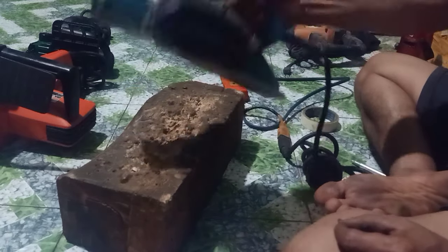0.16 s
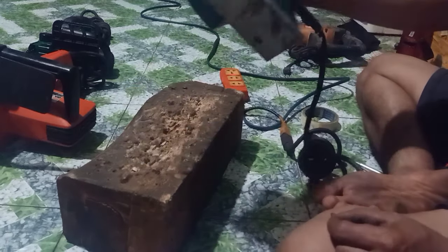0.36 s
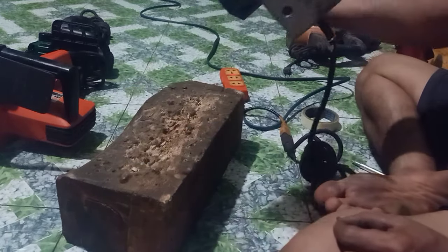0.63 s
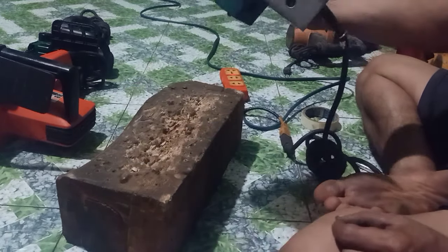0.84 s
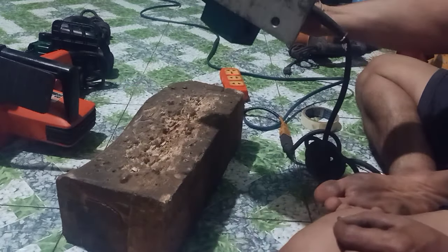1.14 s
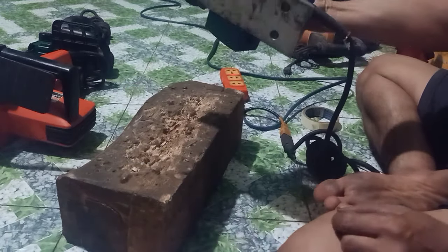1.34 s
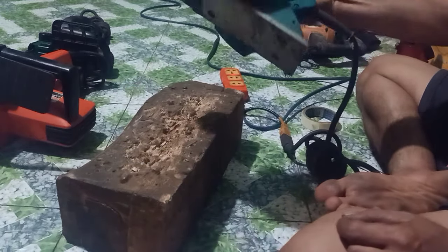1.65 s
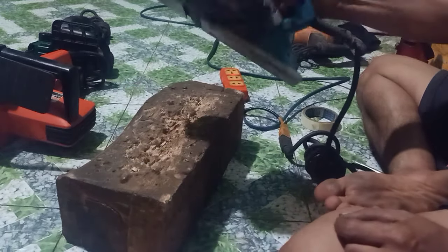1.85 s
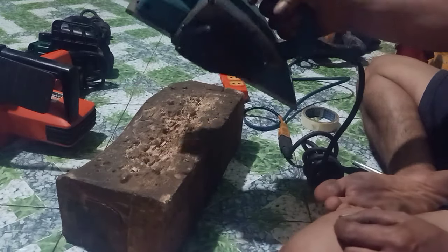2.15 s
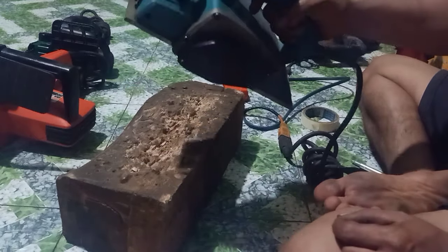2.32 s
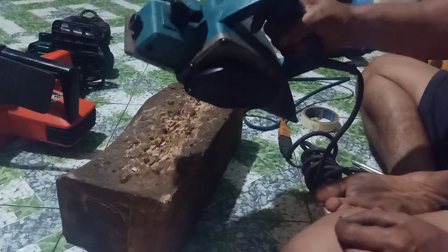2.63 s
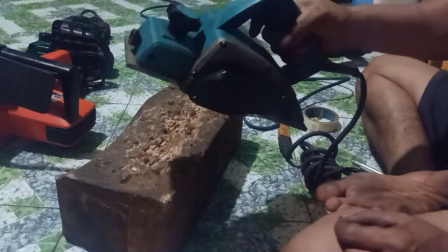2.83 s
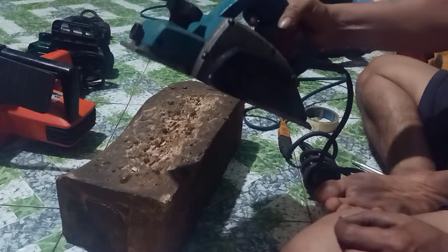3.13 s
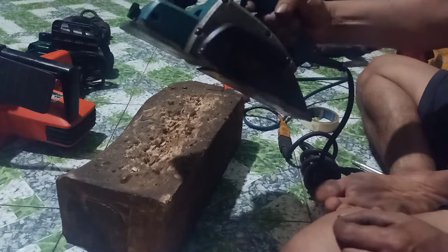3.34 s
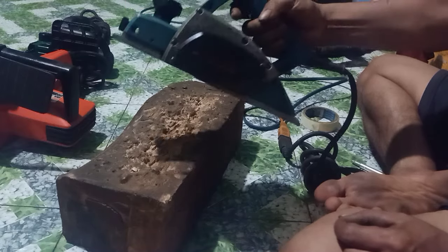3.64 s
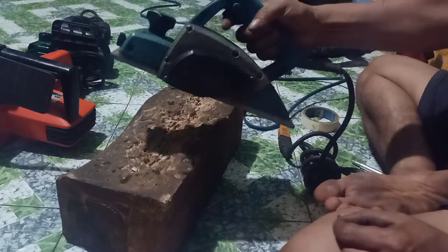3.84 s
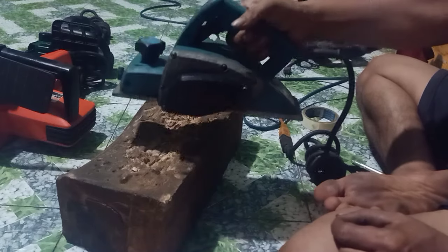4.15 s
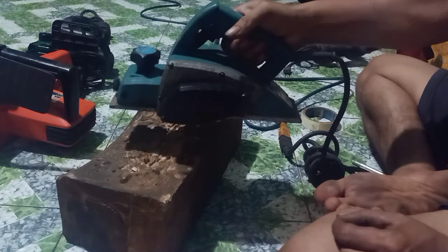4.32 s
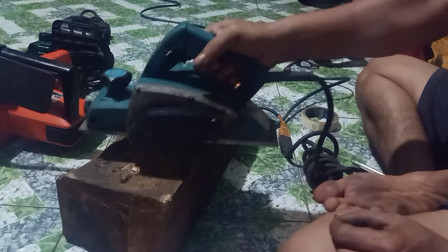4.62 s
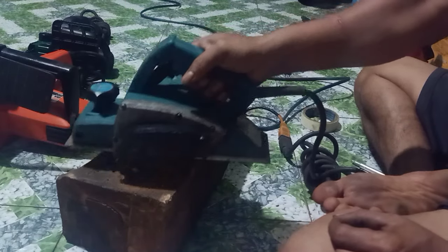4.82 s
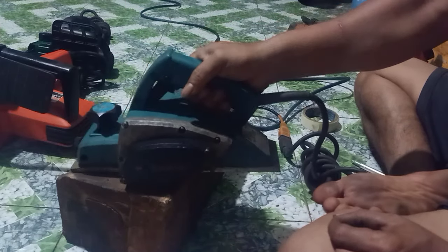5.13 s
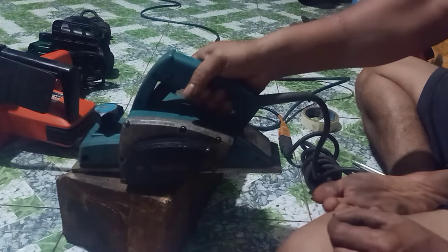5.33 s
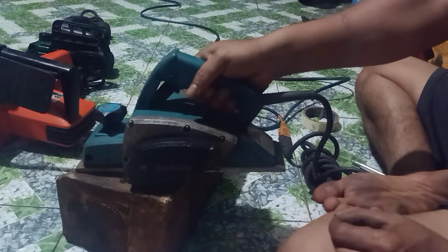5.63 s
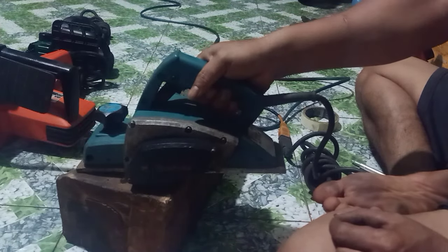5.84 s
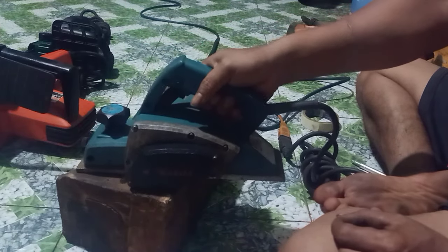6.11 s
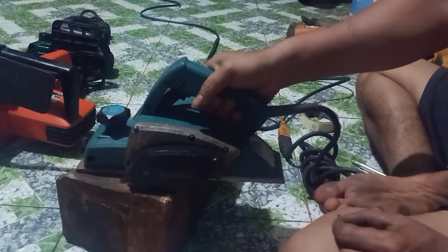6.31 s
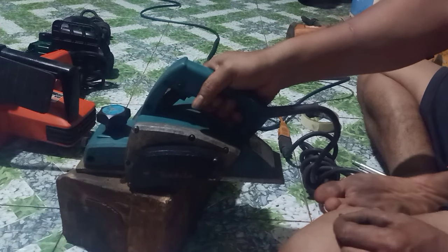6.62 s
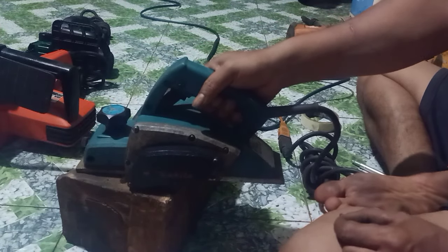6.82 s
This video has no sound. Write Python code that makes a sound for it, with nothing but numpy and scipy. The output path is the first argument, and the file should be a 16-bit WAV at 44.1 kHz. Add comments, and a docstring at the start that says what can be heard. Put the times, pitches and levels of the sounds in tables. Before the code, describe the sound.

A corded electric planer is heard close up in a small, reflective tiled room. From 0 s it is already running, its siren-like whine climbing quickly during the first second and settling by about 2 s, with a thinner, higher motor whine above, broad fan rush, brush hiss and rattling housing. A dull handling bump comes near 0.2 s. Until 3.9 s it spins freely, without biting wood, its strong tones swelling, fluttering and shifting side to side as the tool turns. At 3.9 s power is cut and the whine begins a long smooth fall, growing rougher and weaker. From about 4.2 s it buzzes against a wooden block, with short sliding scrapes around 4.7, 5.3 and 5.9 s. Chirpy bearing knocks start near 4.9 s, scattered at first, then cluster densely from 6 s into a ringing, grating chatter. The drum is still turning when the sound ends around 7 s.

```python
"""In a tiled room, a corded electric hand planer runs up unloaded over a wooden block, is switched off and coasts down.
The two-knife cutter drum chops the air like a siren; the belt-driven motor whines above it as its slots pass.
Fan air and brush hiss are coloured noise, and worn bearings rattle the resonances of the housing.
As the drum slows, the rattle breaks up into chirping knocks of the bearing cage that set the sole ringing.
Resting on the block, the tool bumps, slides and buzzes while the wood drones; a diffuse tail follows."""
import sys
import numpy as np
from scipy import signal
from scipy.fft import rfft, irfft
from scipy.io import wavfile
from scipy.ndimage import uniform_filter1d, map_coordinates

SR = 44100
rng = np.random.default_rng(int(sys.argv[2]) if len(sys.argv) > 2 else 0)


def waveform_to_disk(signal):
    """Save audio, clipped to [-1, 1], as 16-bit WAV at the path in sys.argv[1]."""
    frames = np.transpose(np.atleast_2d(signal))
    scaled = np.clip(frames, -1, 1) * 32767
    samples = np.round(scaled).astype(np.int16)
    wavfile.write(sys.argv[1], SR, samples)


N = 307377
TIME = np.arange(N) / SR
FREQS = np.fft.rfftfreq(N, 1 / SR)
FULL_HZ = 304.32  # rotation that the drum approaches under power, turns per second
OFF_S = 3.9  # the switch is let go
BELT_RATIO, CAGE_ORDER = 1.772, .355  # turns of the armature and of the bearing cage per turn of the drum

# Resonances of the housing. Each row: frequency in Hz, width in Hz, relative level in dB.
HOUSING_MODES = [(1243, 130, -6), (1412, 29, 2), (1513, 76, 2.5), (1974, 212, 3), (2241, 120, 6.5),
                 (2460, 280, 0.5), (2808, 187, 0), (3082, 106, -1.5), (3580, 490, -6.5), (4700, 480, -11.5)]
# Resonances of the metal sole. Each row: frequency in Hz, width in Hz, relative level in dB.
SOLE_MODES = [(1287, 43, 9.5), (2770, 73, 0.5), (4990, 440, -9.5)]


def drum(hz, turns):
    """Siren principle: two knives interrupt the air at the slot, giving even multiples of the rotation."""
    # How well the slot radiates each pitch. Each row: frequency in Hz, gain in dB.
    slot_gain = [(160, -17), (400, -22), (450, -7.5), (1100, -9), (1270, -9), (1780, -8), (2070, -1.5),
                 (2400, -3.5), (3000, -16.5), (3530, -10.5), (3700, -17), (4550, -11.5), (4850, -26)]
    # Weaker partials. Each row: multiple of the rotation, relative level in dB.
    overtones = [(12, -8.5), (14, -14.5), (16, -9), (20, -4.5)]
    # The main partials beam their own ways as the tool is turned and set down.
    # Each row of the five tables: time in seconds, gain in dB.
    beam_2 = [(.1, -2), (.17, -16), (.25, 0.5), (.33, -6.5), (.48, 2), (.75, -10), (.92, 6), (1.08, -4.5),
              (1.25, -8), (1.6, 4.5), (2.2, -0.5), (2.75, -15), (3.05, -1), (3.9, -6), (3.98, 2.5),
              (4.09, -3), (4.16, -6), (4.33, -3), (4.43, 1), (4.58, -4.5), (4.72, 2), (5.45, 4.5),
              (6.1, -1)]
    beam_4 = [(.3, -0.5), (.95, 2.5), (1.08, -4.5), (1.26, 5), (1.42, -0.5), (2.0, 4), (2.15, -1.5),
              (2.5, -4.5), (2.9, 3.5), (4.4, 3), (4.7, -1), (4.85, -6), (5.08, 2), (5.33, -2), (5.52, 6.5),
              (5.8, 0.5), (6.05, -8.5)]
    beam_6 = [(.1, -6), (.45, 0), (.84, -4), (.97, 3.5), (1.33, 5), (1.55, 9.5), (2.25, 3), (2.55, 8),
              (2.85, 1), (3.1, 2.5), (3.35, -3), (3.6, -3.5), (3.76, 4.5), (3.91, 6), (4.0, -2), (5.3, -2),
              (5.88, -4), (6.05, 6.5), (6.22, -6)]
    beam_8 = [(0, -21), (.15, 3), (.25, -6), (.42, 6), (.75, 2.5), (1.3, 5.5), (1.62, -3), (2.1, 3),
              (2.27, -7), (2.54, 5), (2.87, -4.5), (3.05, 6.5), (3.33, -0.5), (3.56, 7.5), (3.88, -4.5),
              (4.05, -1), (4.22, -6), (4.36, 1), (4.55, 0), (4.7, -12), (5.3, -11)]
    beam_10 = [(.02, -5), (.1, 6.5), (.17, -6), (.24, 4), (.35, -4), (.7, 1.5), (1.15, 9), (1.55, 10.5),
               (1.95, -2.5), (2.2, -1.5), (4.2, 1), (4.67, -8), (4.8, -1), (5.1, 4.5), (5.25, -4.5),
               (5.5, -8)]
    beams = {2: beam_2, 4: beam_4, 6: beam_6, 8: beam_8, 10: beam_10}
    # The same beams sweep across the two ports. Under each multiple of the rotation,
    # each row: time in seconds, left minus right in dB.
    beam_sweep = {2: [(.4, 7), (1.6, 1), (2.1, -9), (2.8, 12), (3.5, 9.5), (4.0, -3)], 4: [(1.8, -7),
                  (2.15, 20), (2.55, 13), (2.85, -12), (3.2, 0)], 6: [(1.3, 5), (2.1, -3), (2.5, 10),
                  (2.85, -10), (3.35, 8), (3.85, 16), (4.05, 0)], 8: [(.7, -1), (1.2, 0.5), (1.45, 16),
                  (2.25, 8), (2.5, 6.5), (3.6, 4.5), (4.0, 8)], 10: [(.5, -3), (1.0, 1), (1.55, 6),
                  (2.1, -2.5)]}
    # Hum of the imbalance, strongest where it shakes the body at its own pitch.
    # Each row: rotation in Hz, level in dB.
    hum_by_speed = [(110, -70), (130, -61.5), (185, -53), (225, -55.5), (300, -53.5)]
    # The hum dips while the tool is held up highest. Each row: time in seconds, gain in dB.
    hum_beam = [(.9, -5.5), (1.9, -13), (2.9, -1.5), (4.7, -2.5)]
    siren_db, siren_power = -28.5, 1.42  # relative level, and power of the speed in its amplitude
    flicker_hz = 9  # times the root of the multiple
    belt_shake_turns = .013  # with the power off the slack belt roughens the high lines most

    coasting = np.interp(TIME, [OFF_S, OFF_S + .1], [0, 1])
    turns = turns + 0.0024 * walk(1.7) + belt_shake_turns * coasting * walk(38)
    # the lines flicker most in the long glide after switch-off, high lines fastest
    flicker = .08 + .25 * coasting
    siren = 0
    for k, beam in beams.items():
        pan_db = curves(beam_sweep[k])[0]
        line = partial(k * turns, flutter_db=0.72, pan_db=pan_db, spread=0.2 * np.sqrt(k))
        gain = at_pitch(slot_gain, k * hz) * undb(curves(beam)[0])
        siren = siren + gain * fading(flicker, flicker_hz * np.sqrt(k)) * line
    for k, db in overtones:
        line = partial(k * turns, flutter_db=2.5, pan_db=4, spread=.5)
        siren = siren + at_pitch(slot_gain, k * hz) * undb(db) * line
    hum_gain = at_pitch(hum_by_speed, hz) * undb(curves(hum_beam)[0])
    hum = hum_gain * partial(turns, flutter_db=3.5, pan_db=2, spread=0.1)
    return undb(siren_db) * siren * (hz / FULL_HZ) ** siren_power + hum


def rotation():
    """Rotational dynamics: a two-stage exponential run-up, then viscous air drag plus constant dry friction."""
    # Stages of the run-up. Each row: rotation still to gain in Hz, time constant in seconds.
    run_up = [(18.88, .236), (66.16, .985)]
    drag_s, friction_hz_per_s = 4.924, 34.7  # time constant of the drag; steady braking
    powered = np.minimum(TIME, OFF_S)
    hz = FULL_HZ - sum(gap * np.exp(-powered / lag) for gap, lag in run_up)
    brake = friction_hz_per_s * drag_s
    return (hz + brake) * np.exp(-(TIME - powered) / drag_s) - brake


def motor(hz, turns):
    """Slot-passing tone: twelve slots whine above the shaft hum; cage rocking adds phase-modulation sidebands."""
    # Gain as the whine glides through resonances of the casing. Each row: frequency in Hz, gain in dB.
    casing_gain = [(4500, -2), (4930, 11.5), (5230, 8.5), (5380, -3), (5700, -1), (5880, 1), (6330, 1.5),
                   (6430, 1.5)]
    slots = 12
    whine_db = -42
    # it eases with the current, and fades faster once the current is off
    ease_db_per_s, extra_fade_db_per_s = 2.1, 17
    shaft = BELT_RATIO * turns
    rock = .14 * np.cos(2 * np.pi * CAGE_ORDER * turns) + .06 * walk(50)
    whine = partial(slots * shaft + rock, flutter_db=3, pan_db=-6, spread=1.5)
    hum = partial(shaft, flutter_db=2.5, pan_db=1, spread=.6) * (hz / FULL_HZ) ** 2
    casing = at_pitch(casing_gain, slots * BELT_RATIO * hz)
    fade_db = ease_db_per_s * TIME + extra_fade_db_per_s * np.maximum(TIME - OFF_S, 0)
    return undb(whine_db - fade_db) * casing * whine + undb(-54.5) * hum


def rush(hz, turns, cage):
    """Amplitude-modulated noise: knife passes pulse the fan air; the cage throbs in the rattle and brush hiss."""
    # Spectrum of the fan air. Each row: frequency in Hz, relative density in dB per Hz.
    air_spectrum = [(25, -49), (45, -54), (85, -19.5), (130, -20), (220, -21.5), (340, -8), (450, -8.5),
                    (650, 7), (850, 3), (1050, 7), (1250, -2), (2500, 1), (5000, -40), (12000, -45)]
    # Spectrum of the brush hiss as the microphone ports colour it, with dips and peaks above 9 kHz.
    # Each row: frequency in Hz, relative density in dB per Hz.
    hiss_at_ports = [(200, -60), (1500, -50), (3000, -0.5), (4200, -0.5), (5000, 1), (5700, 3), (7200, 3),
                     (9000, -2), (9800, -9), (11300, -5.5), (12500, -13.5), (13500, -7.5), (14300, -12),
                     (15400, -11.5)]
    # relative level in dB, and the power of the speed by which the amplitude grows
    air_db, air_power = -39.5, 0.46
    rattle_db, rattle_power = -31, 0.24
    hiss_db, hiss_power = -39.5, .1
    speed = hz / FULL_HZ
    knife = 1 + speed ** 2 * (0.22 * np.cos(4 * np.pi * turns) + 0.29 * np.cos(8 * np.pi * turns))
    air = undb(air_db) * speed ** air_power * noise(colour(air_spectrum), knife)
    shaking = knife * cage * undb(1.43 * walk(58))
    rattle = undb(rattle_db) * speed ** rattle_power * noise(ring(HOUSING_MODES), shaking)
    hiss = undb(hiss_db) * speed ** hiss_power * noise(colour(hiss_at_ports), np.sqrt(np.abs(cage)))
    return air + rattle + hiss


def throb(hz, turns):
    """Periodic friction: the bearings rub hardest once a cage round; slowing deepens the throb and grains it."""
    strike_s = 6.805  # reference strike; the others fall near whole rounds from it
    slack = 1 - hz / FULL_HZ
    rounds = CAGE_ORDER * (turns - np.interp(strike_s, TIME, turns))
    depth = np.clip(.22 + .25 * slack, 0, 1)
    beat = 1 + depth * np.cos(2 * np.pi * rounds + 0.66 * walk(5.8))
    grains = unit(undb(3 * np.clip(walk(350), -2.5, 2.5)))
    return beat * np.sqrt(1 - slack + slack * grains ** 2)


def knocks(hz):
    """Friction-driven modes: knocks scrape high modes, lock into falling chirps if hard, and ring the low modes."""
    # Knocks of the loose bearing cage in the slowing drum. Each row: time in seconds, pitch of the chirp
    # at that time in Hz, relative level of the chirp in dB, relative level of the low ring in dB.
    cage_knocks = [(4.893, 2110, -25, -36), (4.918, 2230, -28, -32), (4.959, 2150, -27, -52),
                   (4.976, 2150, -31, -38), (5.127, 2090, -26, -30.5), (5.302, 2000, -50, -29.5),
                   (5.535, 2210, -26.5, -37), (5.561, 2040, -28, -34), (5.642, 2070, -27, -37),
                   (5.725, 2100, -44, -33), (5.817, 2060, -25, -45), (5.837, 2050, -27, -54),
                   (5.856, 2250, -28.5, -41), (5.874, 2050, -36, -38), (5.892, 2040, -29.5, -50),
                   (5.955, 2220, -31, -44), (6.037, 2200, -24, -36), (6.056, 2290, -24.5, -41),
                   (6.104, 2210, -30, -41), (6.123, 2240, -26, -52), (6.197, 2200, -27, -29.5),
                   (6.214, 2130, -24, -32), (6.238, 2090, -29, -28), (6.259, 2140, -29, -30),
                   (6.282, 2050, -24, -28), (6.305, 2160, -23.5, -33), (6.33, 2090, -27, -29),
                   (6.355, 1930, -28, -38), (6.386, 1990, -25.5, -50), (6.41, 2100, -30, -46),
                   (6.456, 2100, -28, -53), (6.537, 2250, -24, -45), (6.563, 2170, -24.5, -53),
                   (6.588, 2160, -26, -51), (6.676, 2180, -30, -47), (6.712, 1960, -24.5, -32.5),
                   (6.744, 2220, -23, -26.5), (6.774, 2220, -20, -36), (6.806, 2180, -19, -53),
                   (6.837, 2160, -23, -39), (6.867, 2170, -29, -33), (6.899, 2140, -31, -31),
                   (6.932, 2100, -31, -32)]
    share, tail = .28, .85  # rise as a share of the cage's round; fall as a share of the rise
    chirp_fall_hz_per_s = 10000
    pure_db = -26  # a knock listed at this level puts half its chirp power into a tone
    ring_s = .016  # fall time of the low ring
    low, scrape, chirps = 0, 0, 0
    waver = .1 * walk(120)
    for (s, pitch, chirp_db, ring_db), start in zip(cage_knocks, rng.random(len(cage_knocks))):
        length = share / (CAGE_ORDER * np.interp(s, TIME, hz))
        age = TIME - s
        push = undb(chirp_db - 1) * swell(s, length, tail * length)
        pure = 1 / (1 + undb(pure_db - chirp_db) ** 2)
        cycles = start + waver + pitch * age - chirp_fall_hz_per_s * age ** 2 / 2
        chirps = chirps + np.sqrt(2 * pure) * push * np.cos(2 * np.pi * cycles)
        scrape = scrape + np.sqrt(1 - pure) * push
        low = low + undb(ring_db - .5) * swell(s, length, ring_s)
    body = undb(-8) * chatter(HOUSING_MODES[:3]) + chatter(SOLE_MODES[:1])
    return chirps + scrape * noise(ring(HOUSING_MODES[3:]) ** 2, 1) + low * body


def chatter(modes):
    """Stick-slip locking: friction holds on to the strongest resonances and keeps their swing steady."""
    scrape = noise(ring(modes) ** 2, 1)
    return scrape / np.sqrt(uniform_filter1d(np.mean(scrape ** 2, axis=0), size=400))


def block(cage):
    """Contact excitation: bumps, sliding friction and bearing vibration drive the resonances of sole and wood."""
    # The sole slides on the block. Each row: time in seconds, half length in seconds, level in dB.
    slide_list = [(4.68, 0.082, -41), (5.337, 0.04, -36), (5.853, 0.12, -40)]
    # Dull bumps of the handled tool. Each row: time in seconds, length in seconds, level in dB.
    bump_list = [(0.218, 0.13, -51.5), (5.12, 0.032, -59)]
    # Buzz of the vibrating sole on the block. Each row: time in seconds, level in dB.
    contact_level = [(4.2, -39), (4.7, -37.5), (5.4, -39.5), (5.9, -37.5), (6.97, -37.5)]
    # Resonances of the block. Each row: frequency in Hz, width in Hz, relative level in dB.
    wood_modes = [(65.5, 88, -15.5), (114, 21, -9.5), (208, 83, -4.5), (457, 48, 4)]
    slides = sum(undb(db) * swell(s, length, length) for s, length, db in slide_list)
    bumps = sum(undb(db) * swell(s, length / 2, length) for s, length, db in bump_list)
    rasp = noise(ring([(3175, 700, 0)]) ** 2, undb(3.5 * walk(70)))
    thud = noise(ring([(130, 620, 0)]) ** 2, 1)
    drone = undb(-16.5) * noise(ring(wood_modes), 1)
    buzz = undb(curves(contact_level)[0]) * (noise(ring(SOLE_MODES), cage) + drone)
    return slides * rasp + bumps * thud + buzz


def room(x):
    """Diffuse reverberation: exponentially decaying noise from tiles and walls, its bass alike at both ports."""
    t60_s, tail_db, mono_hz = 0.59, -5, 356  # decay by 60 dB, level, corner below which the ports agree
    age = np.arange(SR // 2) / SR
    decay = np.exp(-np.log(1000) * age / t60_s) * (age > .006)
    mid, side = rng.standard_normal((2, len(age))) * decay
    side = signal.sosfilt(signal.butter(2, mono_hz, "high", fs=SR, output="sos"), side)
    tail = np.array([mid + side, mid - side])
    tail /= np.sqrt(np.sum(tail ** 2, axis=1, keepdims=True))
    return undb(tail_db) * signal.fftconvolve(x, tail, axes=1)[:, :N]


def partial(turns, flutter_db, pan_db, spread):
    """Interference: floor reflections shift a fluttering line's balance and phase between ports as the tool moves."""
    sides = np.array([[1], [-1]])
    gain = undb(sides * (pan_db + 2.5 * walk(4.2)) / 2)
    gain = gain / np.sqrt(np.mean(gain ** 2, axis=0))
    # each line arrives by its own mix of paths, so the lines do not line up into pulses
    path = rng.random() + .15 * walk(1)
    between_ports = sides * spread * (.6 + walk(3)) / 2
    phase = 2 * np.pi * (turns + path) + between_ports + 0.064 * walk(51)
    return np.sqrt(2) * gain * unit(undb(flutter_db * walk(31))) * np.cos(phase)


def fading(depth, rate):
    """Multipath fading: a gliding line sweeps through peaks and notches of the room, so it flickers."""
    scattered = depth * (walk(rate) + 1j * walk(rate))
    return np.abs(1 + scattered) / np.sqrt(1 + 2 * depth ** 2)


def noise(response, gate):
    """Filtered turbulence: gated white noise passes a response and reaches both ports, at rms 1 overall."""
    # Width between the microphone ports. Each row: frequency in Hz, side minus mid in dB.
    port_width = [(40, 10), (150, -30), (350, -14), (700, -9), (1500, -0.5), (2500, -5.5), (4500, -0.5),
                  (9000, 0.5)]
    # Balance of the microphone ports. Each row: frequency in Hz, left minus right in dB.
    port_lean = [(300, 0), (2200, 0.5), (3600, 2), (5000, -2.5), (5700, -0.5), (7000, -8), (8800, 5.5),
                 (11300, 0.5), (12700, 3), (15000, -8.5)]
    mid, side = rfft(rng.standard_normal((2, N)) * gate) * response
    width, lean = colour(port_width), np.sqrt(colour(port_lean))
    ports = np.array([(mid + width * side) * lean, (mid - width * side) / lean])
    return unit(irfft(ports / np.sqrt(1 + width ** 2), N))


def ring(modes):
    """Modal superposition: the frequency response of resonances, neighbours swinging in opposite senses."""
    response = 0
    for k, (hz, width, db) in enumerate(modes):
        damping = 1j * FREQS * width
        response = response + (-1) ** k * undb(db) * damping / (hz ** 2 - FREQS ** 2 + damping)
    return response


def at_pitch(points, hz):
    """Spectral envelope: the gain at a pitch, from (Hz, dB) points joined on a logarithmic frequency axis."""
    pitch, db = np.transpose(points)
    return undb(np.interp(np.log(hz), np.log(pitch), db))


def colour(points):
    """Spectral envelope over the whole spectrum, from (Hz, dB) points."""
    return at_pitch(points, FREQS + 1)  # 1 Hz up keeps the logarithm finite


def swell(s, rise_s, fall_s):
    """Gaussian envelope: a smooth bump in time, 1 at its top."""
    age = TIME - s
    shape = np.zeros(N)
    near = (age > -3 * rise_s) & (age < 3 * fall_s)
    shape[near] = np.exp(-(age[near] / np.where(age[near] < 0, rise_s, fall_s)) ** 2)
    return shape


def walk(rate):
    """Band-limited random process: smooth chance with rms 1 that changes about rate times a second."""
    return unit(irfft(rfft(rng.standard_normal(N)) * np.exp(-(FREQS / rate) ** 2), N))


def curves(table):
    """Linear interpolation: the columns of a time table, sample by sample."""
    s, *columns = np.transpose(table)
    return [np.interp(TIME, s, c) for c in columns]


def undb(db):
    """Logarithmic level: decibels to amplitude gain."""
    return 10 ** (np.asarray(db) / 20)


def unit(x):
    """Power normalisation: scale to rms 1."""
    return x / np.sqrt(np.mean(x ** 2))


def scene():
    """Common drive: one rotation governs the tool, whose sound reaches the two ports with a small delay."""
    # Gain as the hand turns the open underside to and from the listener. Each row: time in seconds, gain in dB.
    facing_gain = [(0, 5), (.16, 6), (.57, 2.5), (1.3, 2.5), (1.52, -1.8), (2.05, -0.5), (2.55, 2),
                   (3.06, 1.5), (3.25, 0), (3.95, 0.5), (4.35, -2), (6.97, 0.5)]
    # The tool moves left as it is set down, so the right port hears it later.
    # Each row: time in seconds, lag in milliseconds.
    port_lag = [(3.8, 0.0025), (4.5, 0.058), (5.2, 0.053)]
    hz = rotation()
    turns = np.cumsum(hz) / SR
    facing = undb(curves(facing_gain)[0])
    siren = facing * drum(hz, turns)
    cage = throb(hz, turns)
    machine = motor(hz, turns) + facing * rush(hz, turns, cage) + knocks(hz) + block(cage)
    left, right = siren + machine + room(machine + undb(-7) * siren)
    late = np.arange(N) - curves(port_lag)[0] * SR / 1000
    return np.array([left, map_coordinates(right, [late], order=3, mode="nearest")])


def record(dry):
    """Band limitation: a steep elliptic low-pass cuts the top above 15.6 kHz."""
    return signal.sosfilt(signal.ellip(10, .2, 80, 15600, fs=SR, output="sos"), dry)


dry = scene()
out = record(dry)
waveform_to_disk(out)
```